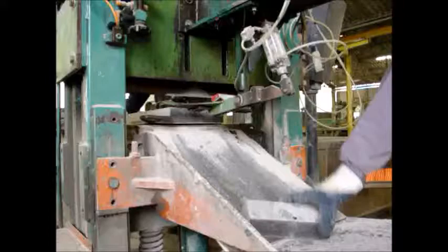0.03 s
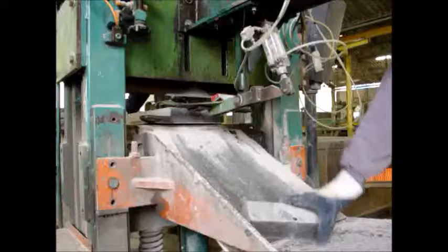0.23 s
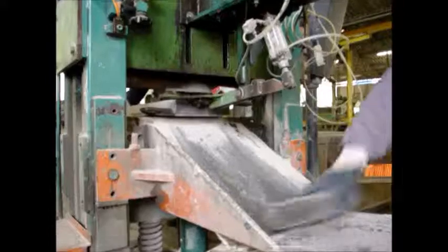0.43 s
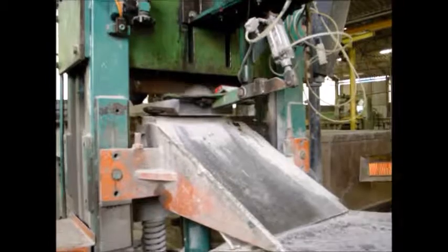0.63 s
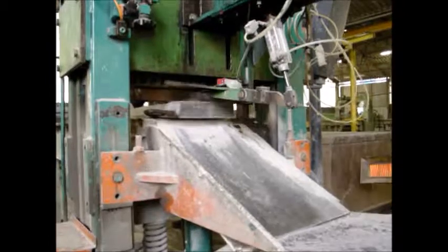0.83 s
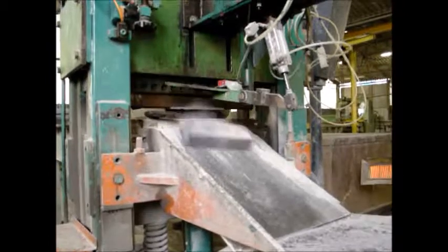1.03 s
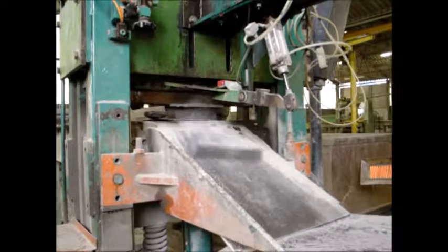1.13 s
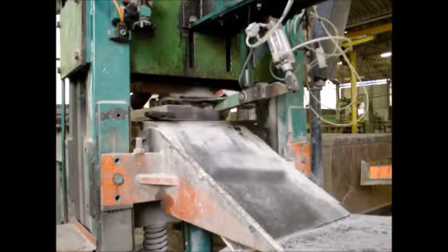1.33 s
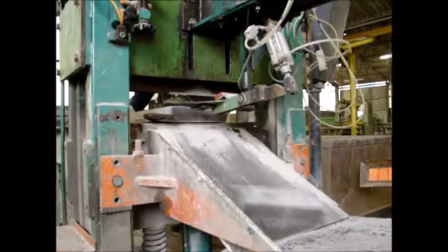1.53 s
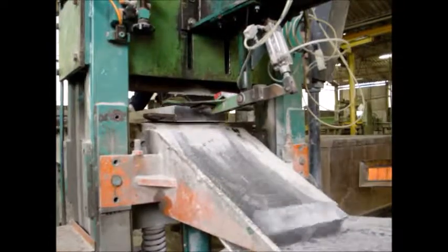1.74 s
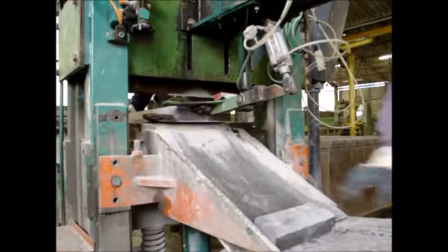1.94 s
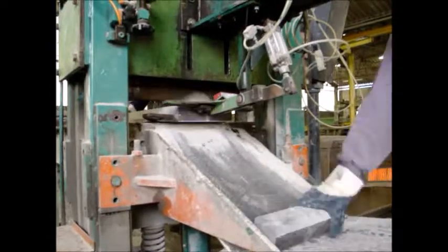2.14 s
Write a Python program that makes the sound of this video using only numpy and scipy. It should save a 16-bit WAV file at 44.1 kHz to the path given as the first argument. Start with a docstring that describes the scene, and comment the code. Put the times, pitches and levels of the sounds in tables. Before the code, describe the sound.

Stone splits sharply in a nearby press, following pump hum, a knock and an air hiss. The piece hits a metal chute, slides amid another hiss and lands with thuds, over echoing factory din. The loudest blows overload the microphone.

```python
"""The din of a factory hall and the harmonic hum of a pump are heard first.
Oil rushes through a valve as the ram of a hydraulic press comes down with a knock, and air valves hiss.
A stone block crackles with tiny fractures and bursts, setting the press frame ringing in its modes.
The piece strikes a steel chute, scrapes down it and thuds on the table.
The hall reverberates, and the loudest blows overload the microphone."""
import sys
import numpy as np
from scipy import signal
from scipy.fft import rfft, irfft
from scipy.io import wavfile

SR = 44100
rng = np.random.default_rng(int(sys.argv[2]) if len(sys.argv) > 2 else 0)


def generate_wav(signal):
    """Clip the signal to [-1, 1] and save it as 16-bit WAV at the path in sys.argv[1]."""
    frames = np.transpose(np.atleast_2d(signal))
    scaled = np.clip(frames, -1, 1) * 32767
    pcm = np.round(scaled).astype(np.int16)
    wavfile.write(sys.argv[1], SR, pcm)


N = 97020
TIME = np.arange(N) / SR


def amp(db):
    """Decibels to amplitude ratio."""
    return 10 ** (np.asarray(db) / 20)


def rms_one(x):
    """Normalisation to rms 1."""
    return x / np.sqrt(np.mean(x ** 2) + 1e-20)


def curve(rows):
    """Linear interpolation of (time_s, value) rows at every sample."""
    return np.interp(TIME, *np.transpose(rows))


def level(rows):
    """Amplitude envelope along (time_s, level_db) rows, silent outside them."""
    return amp(curve(rows)) * (TIME >= rows[0][0]) * (TIME <= rows[-1][0])


def colour(x, spectrum):
    """Spectral shaping by (frequency_hz, gain_db) rows; rms 1."""
    hz, db = np.transpose(spectrum)
    f = np.maximum(np.fft.rfftfreq(N, 1 / SR), 1)
    rumble_cut = f ** 2 / (f ** 2 + 400)
    gain = amp(np.interp(np.log(f), np.log(hz), db))
    return rms_one(irfft(rfft(x) * rumble_cut * gain, N))


def drift(rate_hz):
    """Low-passed noise: a slow random wander of rms 1."""
    f = np.fft.rfftfreq(N, 1 / SR)
    return rms_one(irfft(rfft(rng.standard_normal(N)) / (1 + (f / rate_hz) ** 2), N))


def grains(per_s, spread_db):
    """Shot noise: random impulses of uneven size; rms 1."""
    sizes = amp(spread_db * np.minimum(rng.exponential(1, N), 4))
    return rms_one(sizes * rng.choice([-1, 1], N) * (rng.random(N) < per_s / SR))


def ring(x, hz, t60_s):
    """Damped resonator: a unit impulse starts a decaying sine of height 1."""
    r, w = amp(-60 / (t60_s * SR)), 2 * np.pi * hz / SR
    return signal.lfilter([0, np.sin(w)], [1, -2 * r * np.cos(w), r * r], x + 1e-18)


def blows(rows, attack_s):
    """Incoherent sum: envelopes with a quick rise and exponential decay add in power."""
    power = 0
    for start_s, db, t60_s in rows:
        age = np.maximum(TIME - start_s, 0)
        power = power + (amp(db - 60 * age / t60_s) * (1 - np.exp(-age / attack_s))) ** 2
    return np.sqrt(power)


def clicks(times_s, db):
    """Ideal impulses of the given levels."""
    out = np.zeros(N)
    out[(np.asarray(times_s) * SR).astype(int)] = amp(db)
    return out


# Loudness of the other machines: time_s, level_db
DIN_ENVELOPE = [(.22, -15), (.45, -19.5), (.85, -23), (1.6, -25.5), (1.95, -27.5), (2.2, -26)]
# Their spectrum: frequency_hz, gain_db
DIN_SPECTRUM = [(18, -66), (30, -23), (176, -16), (241, -2), (314, -9.5), (733, -9), (827, -13),
                (1410, -13.5), (1550, -15.5), (1930, -15), (8450, -32.5), (9770, -35.5), (12700, -85),
                (21500, -120)]
def factory_din():
    """Diffuse field: the hall blurs other machines into one wavering noise."""
    return amp(curve(DIN_ENVELOPE) + 0.9 * drift(25)) * colour(rng.standard_normal(N), DIN_SPECTRUM)


# Pump fundamental: time_s, pitch_hz
PUMP_FUNDAMENTAL = [(.22, 247.5), (.45, 248), (.62, 244), (.95, 244.5), (1.7, 248), (2.0, 248.5),
                    (2.2, 240)]
# Loudness of the hum: time_s, level_db
PUMP_ENVELOPE = [(.22, -18.5), (.35, -12), (.4, -18.5), (.55, -11), (.76, -13.5), (.92, -17.5),
                 (1.1, -30.5), (1.5, -42), (1.9, -31.5), (2.1, -22), (2.2, -28)]
# Its partials: harmonic_number, gain_db
PUMP_HARMONICS = [(1, -3), (2, -19.5), (3, -16.5), (4, -21.5), (5, -22), (7, -23.5), (9, -22)]
def pump_hum():
    """Harmonic series: the pump's periodic motion sounds at multiples of one wavering pitch."""
    pitch_hz = curve(PUMP_FUNDAMENTAL) * (1 + 0.00306 * drift(15.7))
    phase = 2 * np.pi * np.cumsum(pitch_hz) / SR
    hum = 0
    for k, db in PUMP_HARMONICS:
        waver_db = (0.8 if k == 1 else 3.0) * drift(7)
        hum = hum + amp(db + waver_db) * np.sin(k * phase + rng.uniform(0, 2 * np.pi))
    return np.sqrt(2) * amp(curve(PUMP_ENVELOPE)) * hum


# Oil flow while the ram travels: time_s, level_db
OIL_ENVELOPE = [(.465, -48), (.485, -13.5), (.56, -17), (.64, -18), (.785, -21.5), (.8, -52)]
# Its spectrum: frequency_hz, gain_db
OIL_SPECTRUM = [(40, -13), (75, 2), (150, -3), (500, -0.5), (950, 5.5), (1600, -2), (2400, 1.5),
                (4500, -4.5), (6000, -9), (9500, -12)]
def oil_rush():
    """Flow noise: oil forced through the valve makes a grainy rush."""
    return level(OIL_ENVELOPE) * colour(grains(per_s=7000, spread_db=3.5), OIL_SPECTRUM)


# Light knocks of valves and stone: start_s, level_db, t60_s
LIGHT_IMPACTS = [(.479, -17.5, 0.14), (.787, -17, 0.027), (1.538, -16, .08), (1.71, -19, 0.1),
                 (1.856, -28, 0.2), (1.986, -23.5, 0.058), (2.052, -26, 0.088), (2.106, -25.5, 0.19)]
# Their spectrum: frequency_hz, gain_db
CLACK_SPECTRUM = [(100, 1), (900, -16), (2500, -0.5), (4200, 1.5), (6000, -4), (10000, -12)]
def clacks():
    """Impact noise: brief contacts reach into the treble as gritty clacks."""
    grit = colour(grains(per_s=4000, spread_db=-0.5), CLACK_SPECTRUM)
    return blows(LIGHT_IMPACTS, attack_s=0.0012) * grit


# Heavy knocks of ram and stone: start_s, level_db, t60_s
HEAVY_IMPACTS = [(.48, -23, .4), (1.523, -14, 0.41), (1.58, -16, 0.26), (1.712, -23.5, 0.37),
                 (2.052, -23, .15)]
# Their spectrum: frequency_hz, gain_db
THUD_SPECTRUM = [(30, -29), (75, 0.5), (130, 0.5), (240, 2.5), (400, -9), (800, 6), (1600, -15),
                 (5000, -53)]
def thuds():
    """Impact noise: slower contacts keep their energy at low frequencies."""
    return blows(HEAVY_IMPACTS, attack_s=0.0044) * colour(rng.standard_normal(N), THUD_SPECTRUM)


# Air valve openings: start_s, length_s, level_db, sag_db_per_s
VALVE_PUFFS = [(0.786, 0.18, -13.5, 63), (1.214, 0.14, -6, 86.5)]
# Spectrum of the hiss: frequency_hz, gain_db
AIR_SPECTRUM = [(300, -24), (2000, -31), (3300, 1.5), (5500, -6), (7000, -0.5), (8500, 5.5), (10000, -5.5)]
def air_valves(attack_s=0.0018, closing_t60_s=0.16):
    """Jet noise: each hiss starts at once, sags as the pressure falls and dies as the valve shuts."""
    flow = 0
    for start_s, length_s, db, sag_db_per_s in VALVE_PUFFS:
        age = np.maximum(TIME - start_s, 0)
        closing_db = 60 * np.maximum(age - length_s, 0) / closing_t60_s
        flow = flow + amp(db - sag_db_per_s * age - closing_db) * np.minimum(age / attack_s, 1)
    return flow * colour(rng.standard_normal(N), AIR_SPECTRUM)


# Runs of cracking in the stone: start_s, level_db, t60_s
FRACTURE_RUNS = [(.890, -8, 0.13), (.920, -11.5, 0.19), (.938, -5.5, 0.11), (.961, -1, 0.036)]
# Their spectrum: frequency_hz, gain_db
FRACTURE_SPECTRUM = [(100, -14), (500, -0.5), (1800, 3), (4000, -2), (6000, -4.5), (10000, -16)]
def stone_crackle():
    """Acoustic emission: each tiny fracture in the loaded stone sends out a click."""
    fractures = colour(grains(per_s=3000, spread_db=-5.0), FRACTURE_SPECTRUM)
    return blows(FRACTURE_RUNS, attack_s=0.0013) * fractures


# Spectrum of the block giving way: frequency_hz, gain_db
BURST_SPECTRUM = [(30, -18), (100, -8), (250, 7.5), (700, 6.5), (1500, 4), (2500, -8.5), (5000, -26),
                  (10000, -32)]
def stone_burst(start_s, level_db=-3, t60_s=0.27):
    """Brittle fracture: stored elastic energy escapes in one burst of noise."""
    envelope = blows([(start_s, level_db, t60_s)], attack_s=0.0013)
    return envelope * colour(rng.standard_normal(N), BURST_SPECTRUM)


# Modes of the press frame: frequency_hz, level_db, t60_s
FRAME_MODES = [(383, -13, 0.8), (568.2, -2, 0.98), (640, -19.5, .4), (817.6, -12, 0.49), (907, -31.5, 0.5),
               (1334, -16.5, 0.21), (1412, -16.5, .4), (1944, -9.5, 0.19)]
def frame_ring(start_s):
    """Free vibration: the unloaded frame springs back and rings in its damped modes."""
    kick = clicks([start_s], [0])
    return sum((-1) ** k * amp(db) * ring(kick, hz, t60) for k, (hz, db, t60) in enumerate(FRAME_MODES))


# Blows of the piece on the chute: start_s, level_db, t60_s
CHUTE_IMPACTS = [(1.059, -10, 0.19), (1.086, -2.5, .15), (1.094, -0.5, 0.24), (1.352, -13, 0.093),
                 (1.393, -18, 0.16), (1.494, -30, 0.073)]
# Spectrum of the contact noise: frequency_hz, gain_db
CLASH_SPECTRUM = [(100, -29), (400, -5), (1200, -2), (2300, 0.5), (4300, 0.5), (5300, -8), (8000, -8.5),
                  (10000, -24)]
# Ringing tones of the stone piece and steel chute: frequency_hz, gain_db, t60_s
STONE_AND_CHUTE_MODES = [(1118, -16.5, 0.6), (1474, -14.5, 0.57), (1903, -12, 0.57), (2031, -15.5, .7),
                         (2395, -14, .6), (2463, -8, 0.52), (2850, -26, .6), (3149, -13.5, 0.17),
                         (3290, -10, 0.38), (3626, -9.5, 0.17), (3960, -16, 0.28), (4197, -6, 0.23),
                         (4500, -15, .35), (4607, -11, 0.33)]
def chute_strikes(ring_db=-4):
    """Impulse excitation: each blow clashes and rings stone and chute in a slightly different mix."""
    contact_noise = colour(grains(per_s=8000, spread_db=2.5), CLASH_SPECTRUM)
    clash = blows(CHUTE_IMPACTS, attack_s=0.00073) * contact_noise
    starts_s, hit_db, _ = np.transpose(CHUTE_IMPACTS)
    ringing = 0
    for hz, mode_db, t60_s in STONE_AND_CHUTE_MODES:
        kicks = clicks(starts_s, hit_db + rng.normal(0, 2.1, len(starts_s)))
        ringing = ringing + amp(mode_db) * ring(kicks, hz, t60_s)
    return clash + amp(ring_db) * ringing


# Loudness of the sliding piece: time_s, level_db
SLIDE_ENVELOPE = [(1.1, -27), (1.16, -10.5), (1.24, -15.5), (1.37, -16), (1.42, -14), (1.53, -15.5),
                  (1.62, -28), (1.7, -31), (1.85, -31), (1.93, -35.5)]
# Spectrum of stone rubbing on steel: frequency_hz, gain_db
SCRAPE_SPECTRUM = [(29, -49), (50, -27), (154, -7), (192, -14.5), (234, -0.5), (305, -11), (334, -2),
                   (389, -7), (554, 4.5), (825, -2.5), (1050, -2.5), (2380, 0.5), (9770, -22.5),
                   (12700, -65), (21500, -120)]
def chute_slide(ring_db=-7, t60_ratio=0.31):
    """Friction noise: sliding grit scrapes and rings stone and chute, now more heavily damped."""
    grit = grains(per_s=2500, spread_db=2.5)
    pressure = level(SLIDE_ENVELOPE) * amp(1.55 * drift(35))
    scrape = pressure * colour(grit, SCRAPE_SPECTRUM)
    force = pressure * grit
    ringing = sum(amp(db) * ring(force, hz, t60 * t60_ratio) for hz, db, t60 in STONE_AND_CHUTE_MODES)
    return scrape + amp(ring_db) * np.std(scrape) * rms_one(ringing)


def hall_reverb(x, t60_s=0.9, gain_db=-13.5, cutoff_hz=3020, delay_s=0.012):
    """Reverberation: dense reflections form a dull, exponentially decaying tail."""
    tail = rng.standard_normal(N) * amp(-60 * TIME / t60_s) * (TIME > delay_s)
    tail = signal.sosfilt(signal.butter(1, cutoff_hz, fs=SR, output="sos"), tail)
    return amp(gain_db) * signal.fftconvolve(x, tail / np.linalg.norm(tail))[:N]


def scene(start_s=0.22, fade_s=0.0064, split_s=0.95):
    """Superposition: the nearby press and chute and their reverberation add to pump, oil and din."""
    near = stone_crackle() + stone_burst(split_s) + frame_ring(split_s)
    near += chute_strikes() + chute_slide() + thuds() + clacks() + air_valves()
    mix = near + hall_reverb(near) + pump_hum() + oil_rush() + factory_din()
    fade_in = np.clip((TIME - start_s) / fade_s, 0, 1)
    return (mix * fade_in)[None]


def record(dry, ceiling=0.97, mic_cutoff_hz=10050, final_cutoff_hz=16000):
    """Saturation: the microphone squashes peaks and cuts treble; overshoot is clipped and low-passed."""
    mic_lowpass = signal.ellip(12, 0.2, 90, mic_cutoff_hz, fs=SR, output="sos")
    final_lowpass = signal.ellip(10, 0.1, 80, final_cutoff_hz, fs=SR, output="sos")
    squashed = dry / (1 + (dry / ceiling) ** 6) ** (1 / 6)
    clipped = np.clip(signal.sosfilt(mic_lowpass, squashed), -1, 1)
    return signal.sosfilt(final_lowpass, clipped)


dry = scene()
out = record(dry)
generate_wav(out)
```